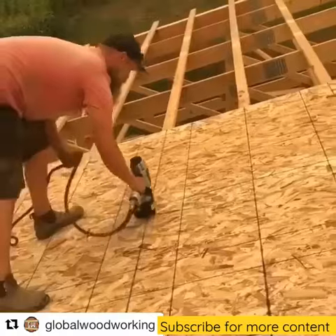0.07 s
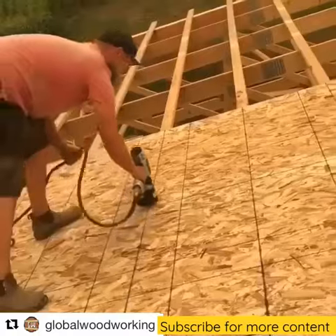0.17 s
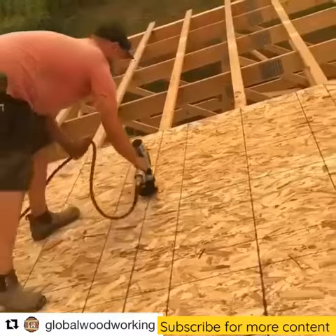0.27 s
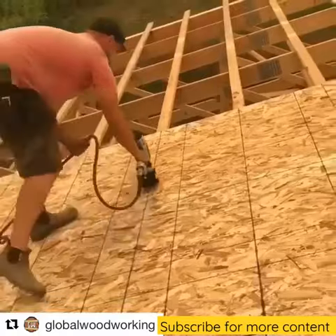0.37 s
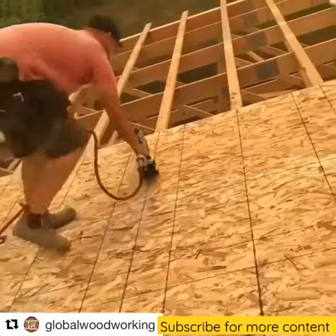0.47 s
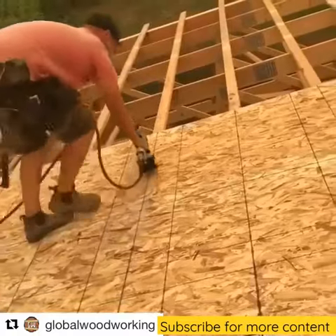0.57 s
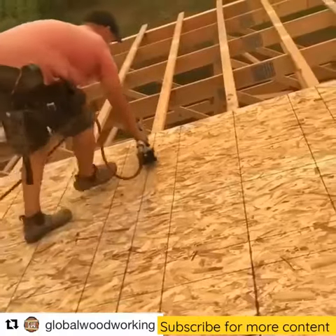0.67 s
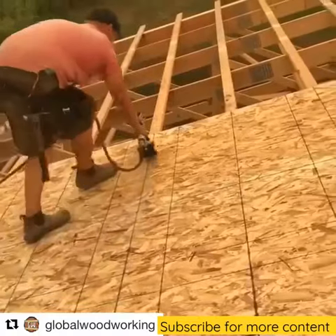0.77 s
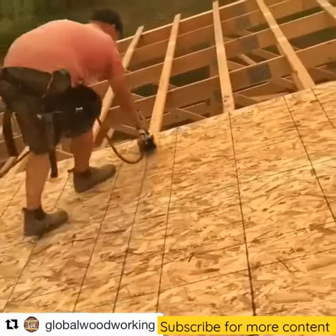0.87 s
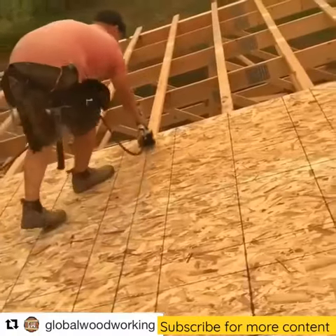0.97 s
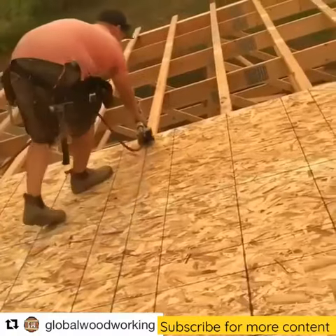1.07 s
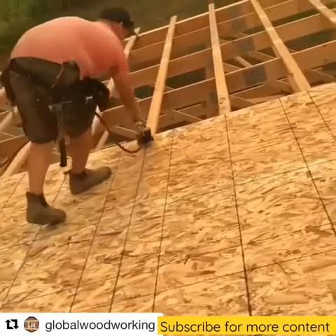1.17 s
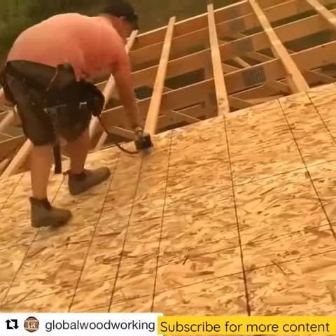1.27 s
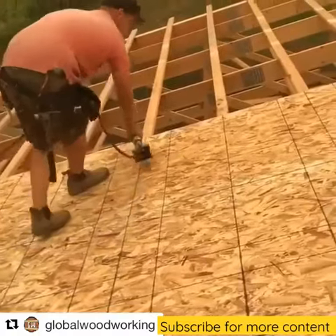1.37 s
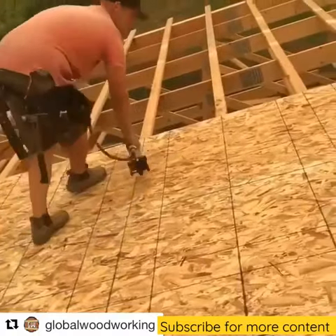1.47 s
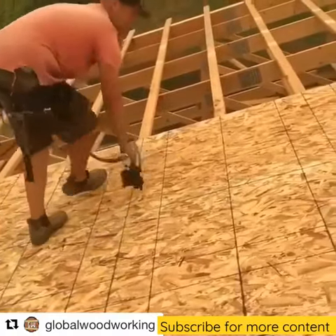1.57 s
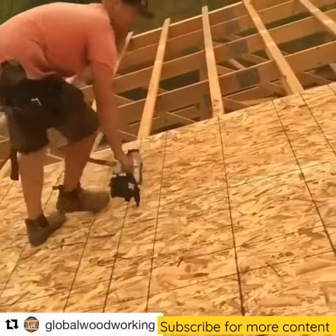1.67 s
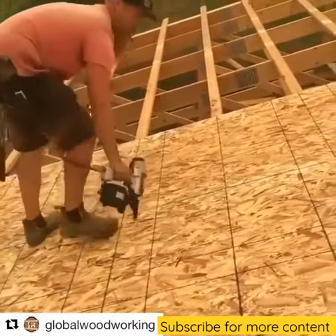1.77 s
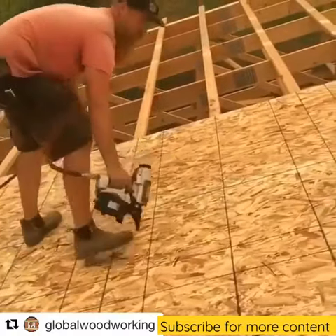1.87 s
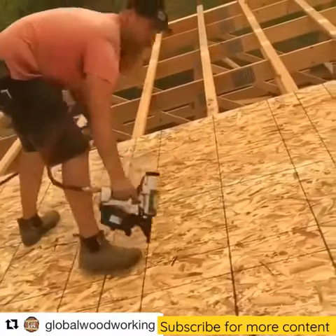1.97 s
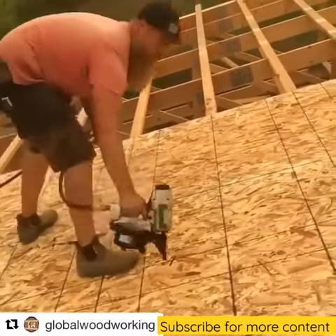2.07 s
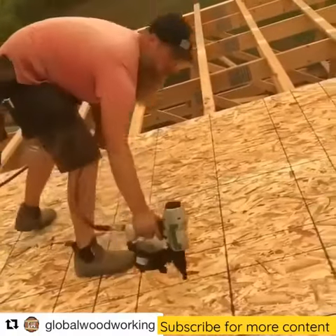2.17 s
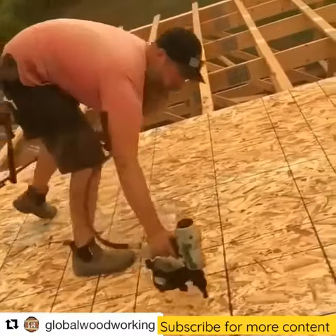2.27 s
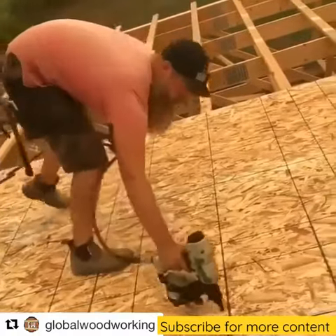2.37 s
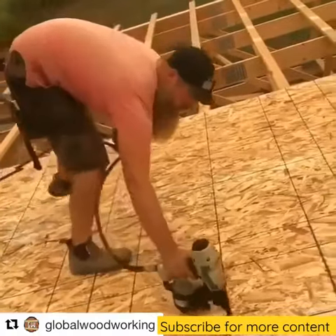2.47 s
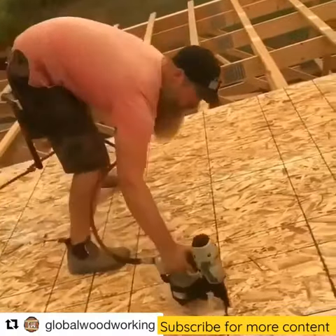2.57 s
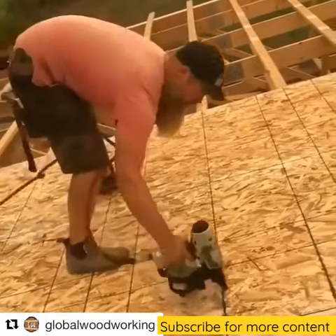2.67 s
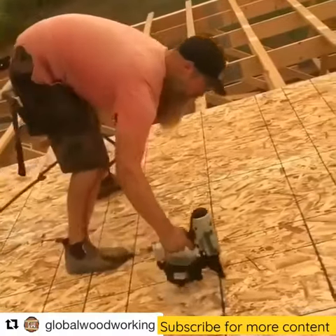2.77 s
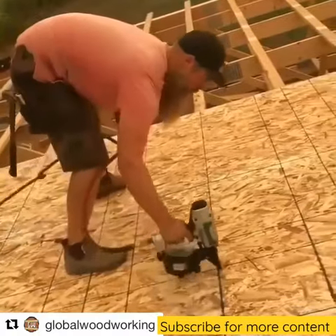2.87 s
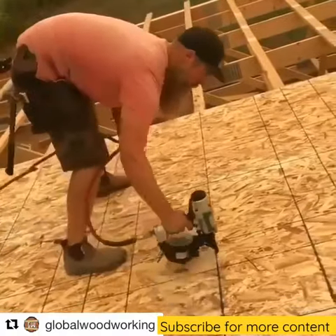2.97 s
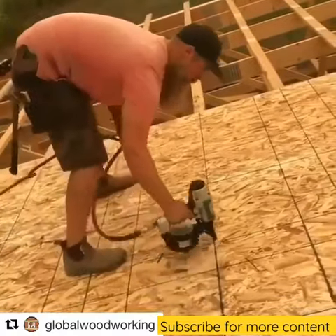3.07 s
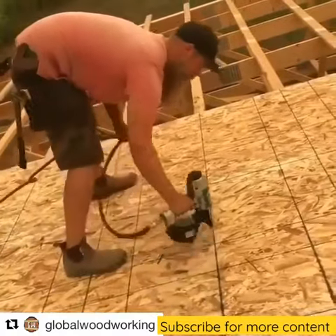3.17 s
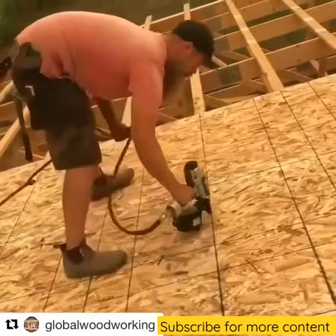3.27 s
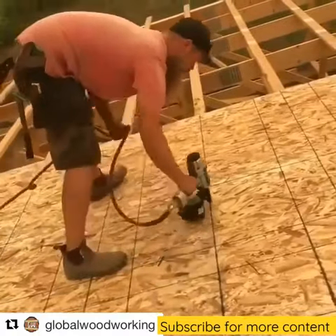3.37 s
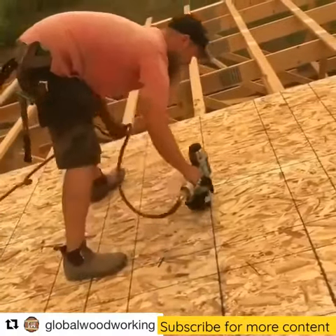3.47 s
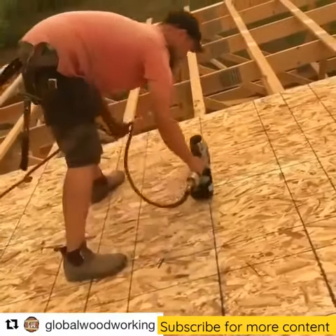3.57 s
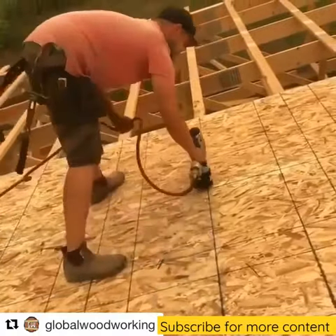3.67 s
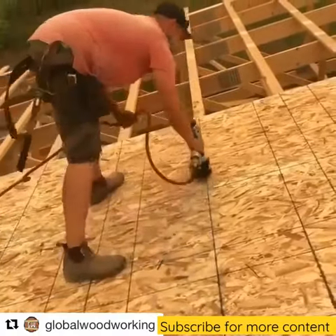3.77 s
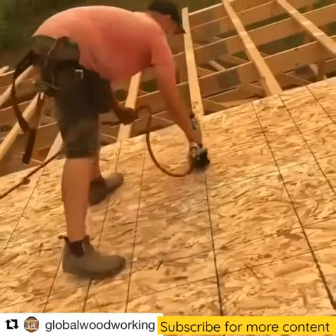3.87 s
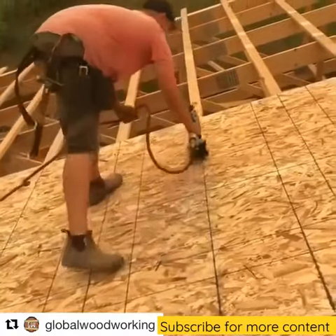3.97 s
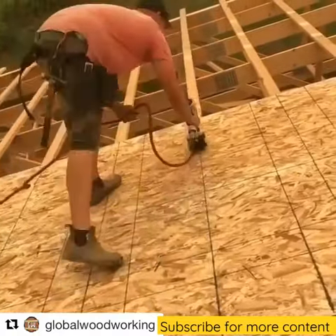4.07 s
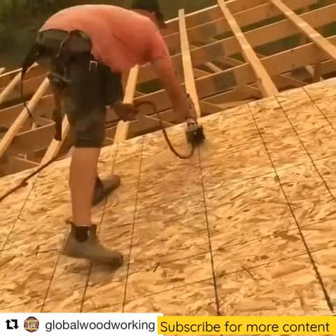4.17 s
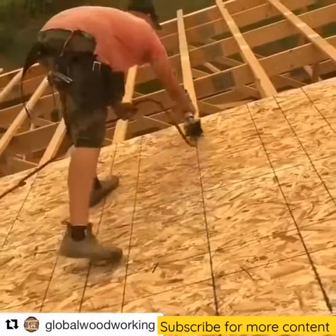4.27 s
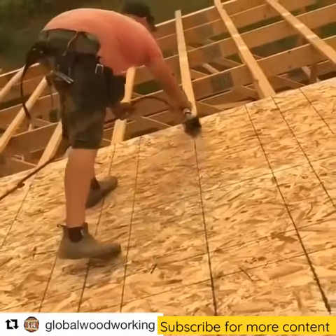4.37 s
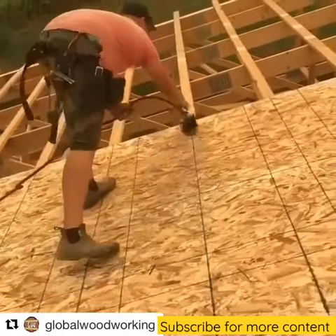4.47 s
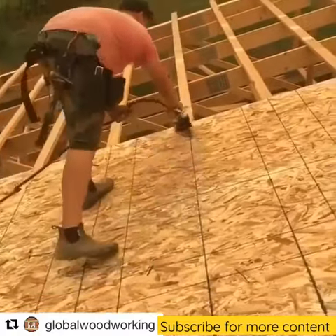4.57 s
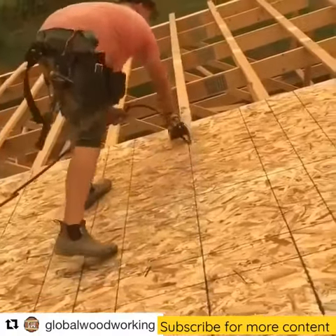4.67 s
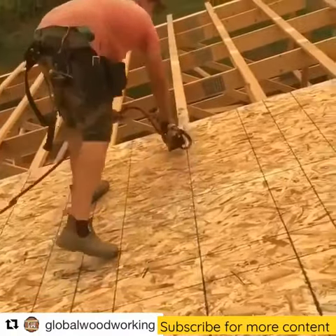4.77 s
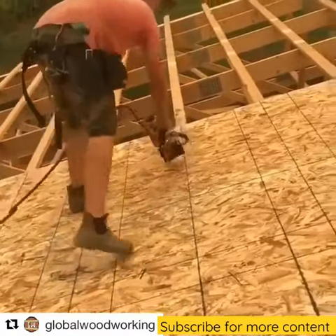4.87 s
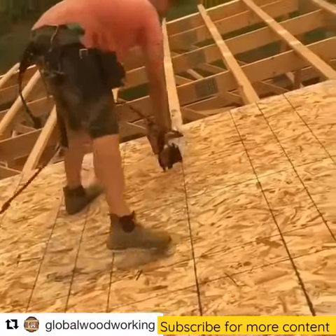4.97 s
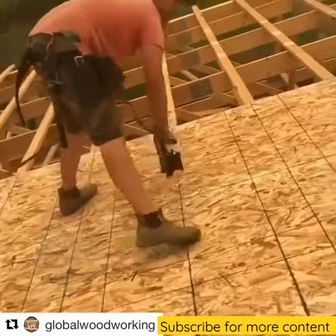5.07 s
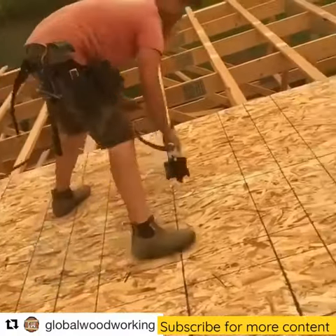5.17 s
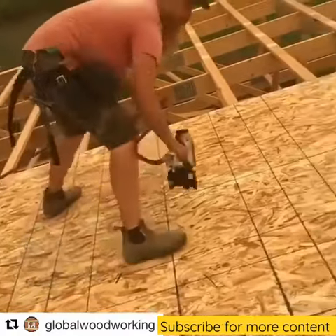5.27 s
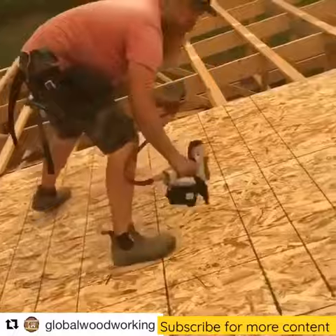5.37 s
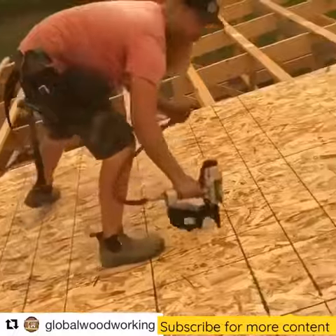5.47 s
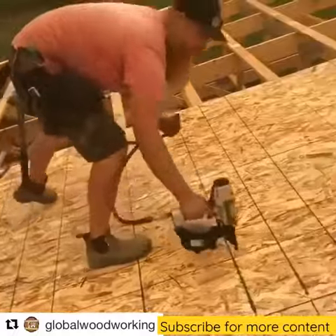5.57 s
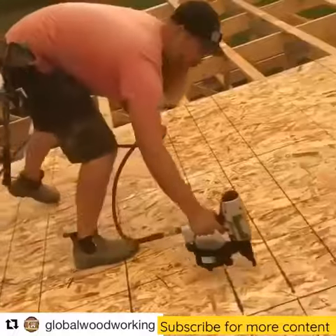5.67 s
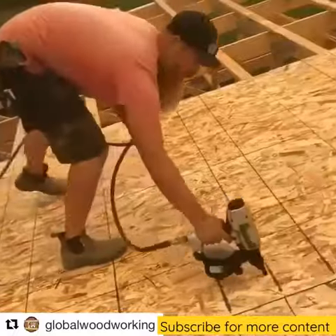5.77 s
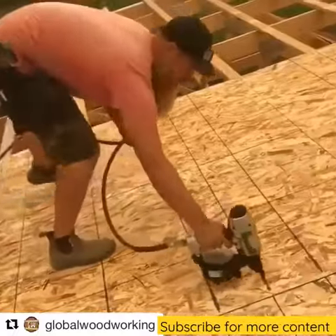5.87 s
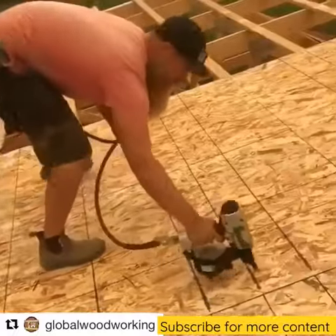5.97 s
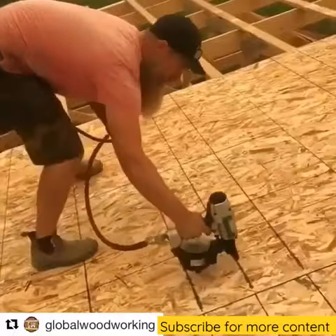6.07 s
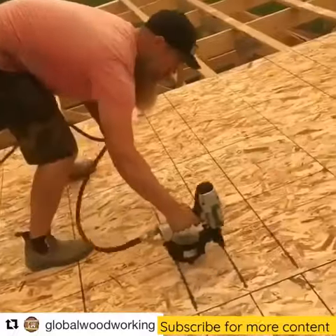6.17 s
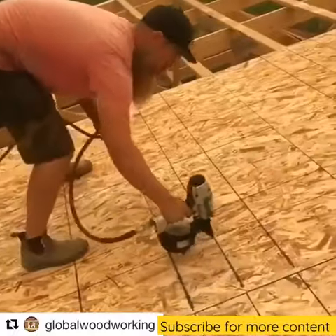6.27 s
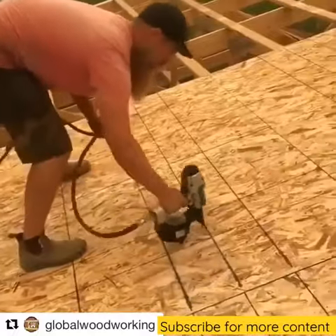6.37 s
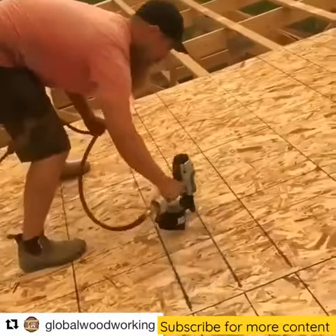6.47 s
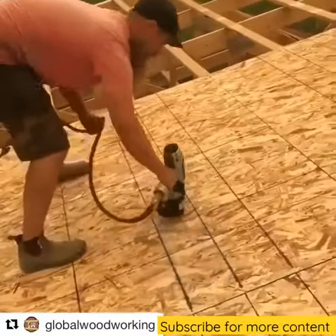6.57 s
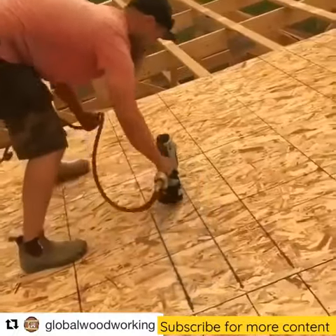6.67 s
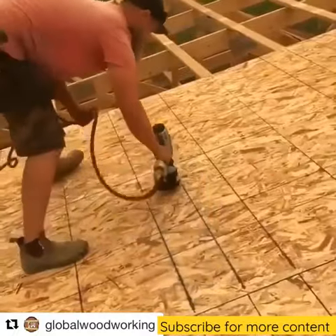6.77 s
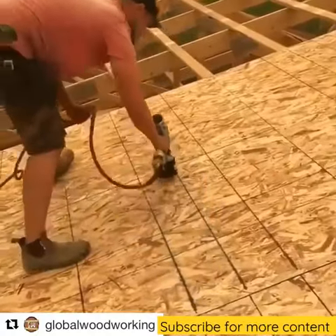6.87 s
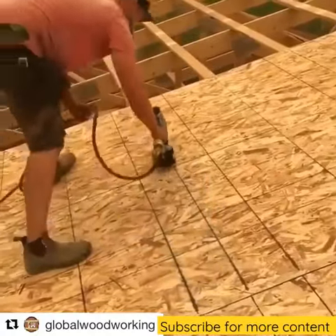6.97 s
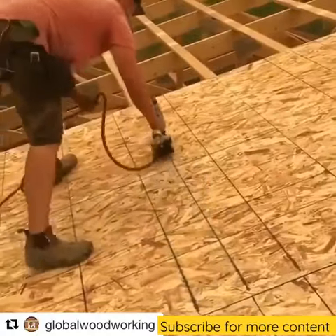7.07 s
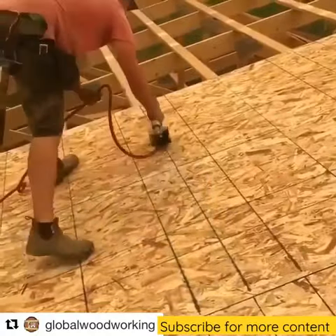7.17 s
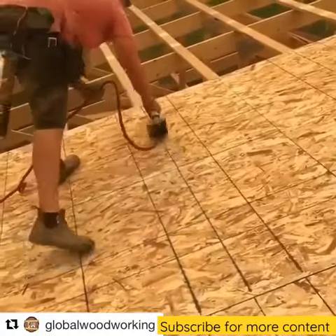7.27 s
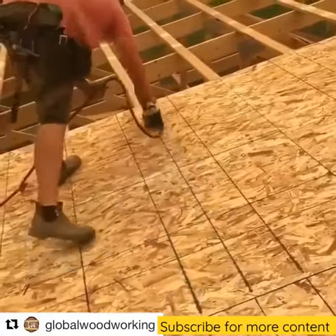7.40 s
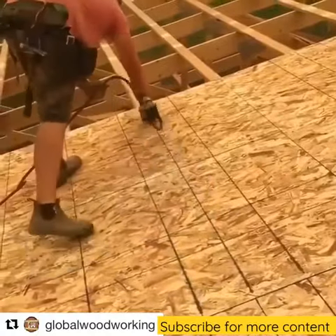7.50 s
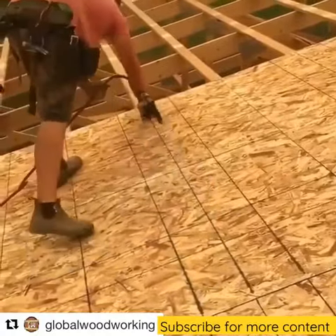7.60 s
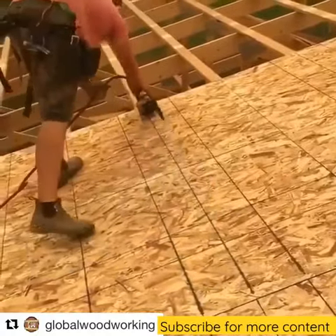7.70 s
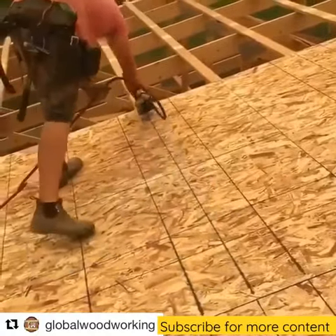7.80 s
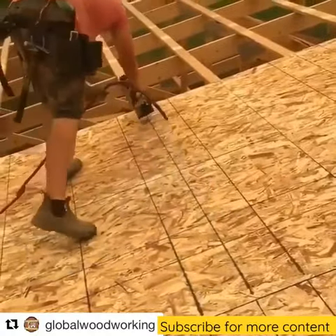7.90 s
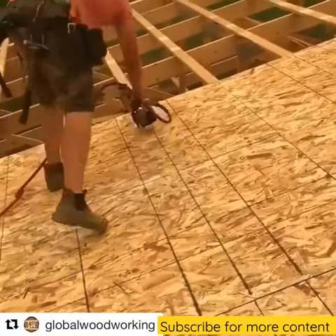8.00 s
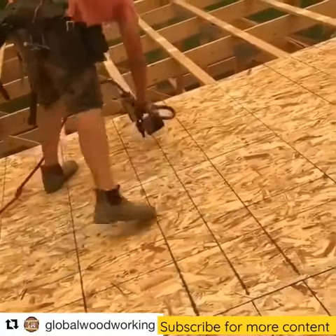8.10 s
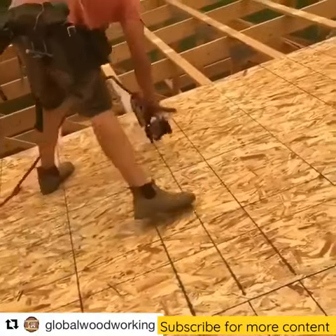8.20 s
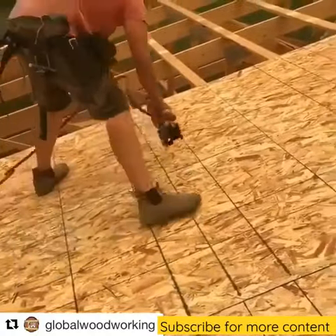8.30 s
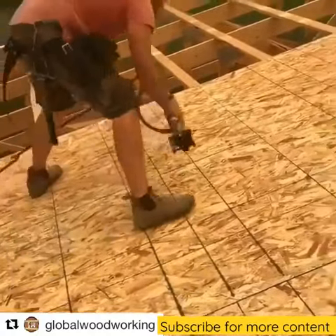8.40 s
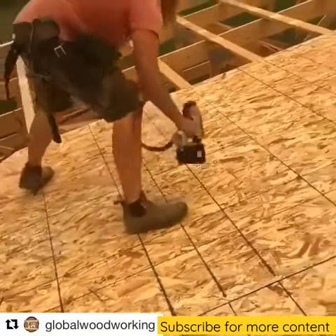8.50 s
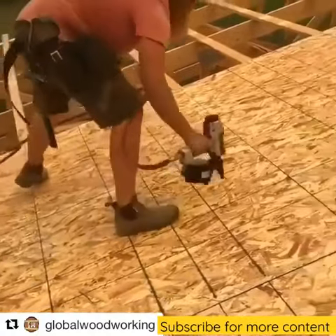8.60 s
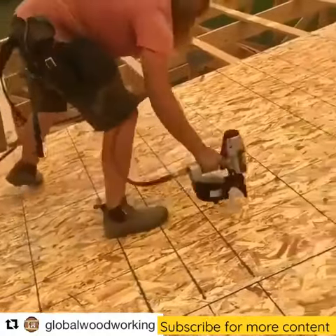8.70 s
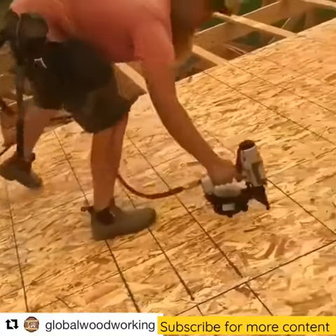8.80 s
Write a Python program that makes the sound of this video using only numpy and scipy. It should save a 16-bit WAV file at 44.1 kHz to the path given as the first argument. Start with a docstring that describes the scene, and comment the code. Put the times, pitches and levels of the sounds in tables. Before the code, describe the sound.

Outdoors on a springy roof deck, a pneumatic nail gun hammers about ten shots a second in three bursts, each softening and dulling as it moves away.

```python
"""A roofer bump-fires an air coil nailer along a wooden roof deck, about ten nails a second, in three runs.
Each shot is a valve pop, the driver's blow 5 ms later, a flex of the sheathing and a puff of exhaust, made
of noise bursts and short swings heard through bodies; it grows softer and duller as the tool moves away.
Between runs boots scuff and thud, the tool knocks and clicks and cloth rustles, over a low roof rumble.
A fast limiter at the microphone holds down the loudest peaks."""
import sys
import numpy as np
from scipy import signal
from scipy.io import wavfile
from scipy.ndimage import uniform_filter1d, minimum_filter1d

SR = 44100
rng = np.random.default_rng(int(sys.argv[2]) if len(sys.argv) > 2 else 0)


def output_pcm(signal):
    """Save a mono or channel-first signal as 16-bit PCM at the path in sys.argv[1].

    Samples are clipped to [-1, 1] before scaling.
    """
    pcm = np.clip(np.atleast_2d(signal).T, -1, 1) * 32767
    wavfile.write(sys.argv[1], SR, np.round(pcm).astype(np.int16))


N = 389844
T = np.arange(SR * 2 // 5) / SR  # time since a hit, s; every hit is cut off after 0.4 s

# one row a nail, levels against a usual one: start_s, blow_db on the wood, steel_crack_db,
# give_db of the spot, flex_hz of the sheet
NAIL_SHOTS = [(0.0225, -3, -1.5, 4.5, 123), (0.1185, -1, 3.5, 4, 131), (0.2144, 1.5, 2, 0.5, 109),
              (0.3082, 0.5, -3, -11, 129), (0.41, -5.5, -16, -18, 73), (0.5138, -4.5, -3, -16, 99),
              (.623, 0.5, 6.5, -2.5, 96), (.726, 0.5, 3, 3.5, 99), (0.8367, 0.5, 0.5, 2, 97),
              (0.9322, -2, -3.5, -1, 130), (1.0307, -1.5, -3.5, 0, 93), (1.1196, -3.5, 2.5, 4.5, 94),
              (1.213, -1, -3, -3, 75), (1.3054, -0.5, -2, -8, 108), (1.405, -0.5, -0.5, -5, 113),
              (2.8102, 4, 1, 1, 101), (3.0175, -4, -3, 5, 114), (3.0872, -4, -15, 10.5, 113),
              (3.366, 1, -1, 9, 116.8), (3.4744, 2, 4.5, 2, 177), (3.5547, -1.5, -16, 3, 75),
              (3.6407, -2, -3, 4.5, 116), (3.7249, -5.5, -3.5, -9, 120), (3.8119, -3, -14, -20, 132),
              (3.9085, -2.5, -5, -27, 140.5), (4.0114, -5, 1.5, -12, 104), (4.1021, -2, -2, -3.5, 103),
              (4.1978, 1.5, -5, 1, 145), (4.3016, 0, 4.5, 3, 136), (4.4027, 1, -0.5, 6.5, 95),
              (4.5009, -1, 0, 0, 118), (4.614, 2.5, 6.5, 0.5, 117), (4.7426, 2, 0, -5.5, 75),
              (4.8488, 0.5, 2.5, -19, 124), (6.2453, 2, 7, 0.5, 101), (6.441, 2.5, 3, 3.5, 100),
              (6.5454, -1, 1, 0, 102), (6.6333, -1, 2, 4, 99), (6.7372, -1, 4.5, 1, 106),
              (6.8361, 0, 1.5, 2, 155), (6.9341, 5, 1, -3, 161), (7.0274, -1, -7, 1.5, 94),
              (7.118, -0.5, -2.5, -2.5, 125.6), (7.2173, 0, -4, -4, 160), (7.322, -2.5, -0.5, -5, 117),
              (7.416, 4.5, 6.5, -1, 119), (7.5138, -2.5, 0.5, 4.5, 115), (7.618, .5, 3.5, 8.5, 142),
              (7.7179, -4, 0.5, 7.5, 146), (7.8188, 0, -3.5, 5, 153), (7.9252, 2, -0.5, 1, 154),
              (8.0205, -.5, 3, -4, 148), (8.1075, -3, -2.5, -17, 149)]
# passes up the roof, the tool sweeping away from the microphone: start_s, end_s, start_distance_m, sweep_s
ROOF_RUNS = [(0, 1.2, 2.64, 0.43), (2.75, 4.87, 1.59, 1.1), (6.2, 8.2, 1.66, .78)]
# spectrum of a blow heard through the roof board: freq_hz, level_db
BOARD_SPECTRUM = [(60, 0), (200, -2.5), (310, -7.5), (430, -13), (620, 0), (820, -2), (1050, -1),
                  (1450, -1), (1950, -14), (2300, -13.5), (2750, -21), (4500, -30), (7000, -62.5),
                  (14000, -47)]
# spectrum of the hollow deck rattling: freq_hz, level_db
DECK_SPECTRUM = [(120, -10.5), (260, 7), (340, 2.5), (450, -5.5), (630, 4.5), (850, -5.5), (1450, -1.5),
                 (2000, -12), (2800, -16.5), (5000, -30.5), (8000, -61)]
# spectrum of the nailer's struck steel: freq_hz, level_db
STEEL_SPECTRUM = [(500, -55), (1500, 15), (2300, -1), (2750, -5), (3300, 9), (4000, 3), (4700, 4.5),
                  (5400, -3), (6500, -17), (7600, -17), (10000, -18), (14000, -49)]
# spectrum of the exhaust end of the tool: freq_hz, level_db
EXHAUST_SPECTRUM = [(500, -6.5), (1500, 2), (2200, -3.5), (2750, -8.5), (3400, 7), (4100, 2), (4700, 1.5),
                    (5400, -6), (6400, -17.5), (7600, -17.5), (9000, -17), (12000, -14), (14000, -44)]


def nailer():
    """The nose slides in, the valve pops, the driver sinks the nail, the deck flexes and the air vents."""
    usual_crack_db, usual_flex_db = -22.5, -17
    out = np.zeros(N)
    for s, wood_db, steel_db, give_db, flex_hz in NAIL_SHOTS:
        valve_db, blow_db, air_db, boom_db, shake_db, dent_db = shot_levels(s, wood_db, give_db)
        late, slack, early, pressure = rng.standard_normal(4)  # how this shot strays from the usual
        hit = s + 0.0053 + 0.0003 * late
        nose_slide(out, s - 0.016 + 0.002 * early, air_db)
        valve_pop(out, s, valve_db)
        drive(out, s, hit, blow_db, usual_crack_db + steel_db, air_db)
        deck_flex(out, s, hit, dent_db, usual_flex_db + give_db, flex_hz, shake_db, boom_db)
        reload(out, s, blow_db, air_db, late, slack)
        exhaust_puff(out, s, air_db, slack, pressure)
    return out


def nose_slide(out, s, air_db):
    """The safety nose slides in and shakes the coil of nails: a grainy scatter of impacts."""
    rattle = sounded(scatter(decay=0.0094, rise=0.0048, grain=0.89), body(EXHAUST_SPECTRUM), echo=0.51)
    add(out, s, amp(0.8 * air_db - 6.0) * rattle)  # fades less with distance than the exhaust


def valve_pop(out, s, valve_db):
    """The firing valve opens with a hollow pop, heard through steel and board."""
    add(out, s - 0.0003, amp(valve_db - 16.5) * swing(hz=1220, rise=0.00051))
    in_steel = sized(through(tap(decay=0.0047, direct=0.23), body(STEEL_SPECTRUM)))
    add(out, s, amp(valve_db - 18.5) * in_steel)
    in_board = sized(through(tap(decay=0.00044, direct=0.32), body(BOARD_SPECTRUM)))
    add(out, s, amp(valve_db - 15.5) * in_board)


def drive(out, s, hit, blow_db, crack_db, air_db):
    """The nail enters the board, then the piston hits its bumper and sets wood and steel ringing."""
    # board around the nail: mode_hz, level_db against the blow
    nail_spot = [(665, -7.5), (1430, -10.5)]
    pitch_spread = 0.093  # share by which the modes vary from spot to spot
    board, steel = body(BOARD_SPECTRUM), body(STEEL_SPECTRUM)
    entry = sized(through(tap(decay=0.00092, direct=-0.41), board))
    add(out, s + 0.003658, amp(blow_db - 4.5) * entry)
    blow = sounded(tap(decay=0.0072, direct=0.54), board, echo=0.19)
    add(out, hit, amp(blow_db + 2.0) * blow)
    crack = sounded(tap(decay=0.00067, direct=0.44), steel, echo=0.34)
    add(out, hit - 0.0005, amp(crack_db + 2.0) * crack)
    add(out, hit, amp(air_db - 22.0) * ring())
    rebound = sounded(tap(decay=0.002, direct=0.8), steel, echo=0.25)
    add(out, hit + 0.0034, amp(air_db) * rebound)
    for hz, db in nail_spot:
        add(out, hit, amp(blow_db + db) * knock(hz * rng.normal(1, pitch_spread), decay=0.01))


def deck_flex(out, s, hit, dent_db, flex_db, flex_hz, shake_db, boom_db):
    """The sheet is pushed in, swings on its rafters, and the blow spreads through the roof."""
    # spectrum of the boom under the deck: freq_hz, level_db
    boom_spectrum = [(25, -23), (55, -15), (100, 9), (135, 2.5), (165, 5.5), (200, 0.5), (245, -2.5),
                     (330, -14), (450, -31), (900, -54.5)]
    add(out, s + 0.00592, amp(dent_db) * swing(hz=250.2, rise=0.0042))
    add(out, s + 0.01018, amp(flex_db - 3.5) * swing(flex_hz, rise=0.0062))
    shake = sounded(scatter(decay=0.052, rise=0.0011), body(DECK_SPECTRUM), echo=0.45)
    add(out, hit, amp(shake_db) * shake)
    boom = sized(through(scatter(decay=0.066, rise=0.0009), body(boom_spectrum)))
    add(out, hit, amp(boom_db + 8.0) * boom)


def reload(out, s, blow_db, air_db, late, slack):
    """The piston returns with a thump and the pawl feeds the next nail with a click."""
    piston = sounded(tap(decay=0.0015, direct=1.0), body(BOARD_SPECTRUM), echo=0.27)
    add(out, s + 0.054 + 0.00278 * late, amp(blow_db - 27.5) * piston)
    pawl = sounded(tap(decay=0.0012, direct=0.52), body(STEEL_SPECTRUM), echo=0.54)
    add(out, s + 0.054 + 0.0081 * slack, amp(air_db - 6.5) * pawl)


def exhaust_puff(out, s, air_db, slack, pressure):
    """A bright jet of air, a longer duller hiss, and a short puff that rings the steel parts."""
    # spectrum of the vent's first jet of air: freq_hz, level_db
    jet_spectrum = [(1500, -10), (4000, 9.5), (5500, 4), (7500, -4), (9000, 0), (12000, -3.5),
                    (14000, -5.5)]
    jet_spread_db = 1.5  # the jet varies from shot to shot
    jet_air = puff(half_open=0.011 + 0.0018 * slack, rise=0.0034, fall=0.019)
    jet = sounded(jet_air, body(jet_spectrum), echo=0.49)
    add(out, s, amp(air_db + 3.5 + jet_spread_db * pressure) * jet)
    hiss_air = puff(half_open=0.021 + 0.0092 * slack, rise=0.023, fall=0.021)
    hiss = sounded(hiss_air, body(EXHAUST_SPECTRUM), echo=0.8)
    add(out, s, amp(air_db + 6.0) * hiss)
    ringing_air = through(puff(half_open=0.023, rise=0.0035, fall=0.0027), ring())
    add(out, s, amp(air_db - 1.0) * sized(ringing_air))


def puff(half_open, rise, fall):
    """Air pressure builds as the valve opens, then drains raggedly from the cylinder (times in s)."""
    opening = 1 / (1 + np.exp(np.minimum((half_open - T) / rise, 50)))
    draining = np.exp(-np.maximum(T - half_open, 0) / fall)
    flow = opening * draining * flutter(len(T), depth_db=2.0, size=110)
    return sized(flow * rng.standard_normal(len(T)))


def ring():
    """The nailer's steel parts as decaying sines, struck a little differently each time."""
    # steel parts: ring_hz, level_db, t60_s
    steel_parts = [(3500, -13, .08), (4080, -1, 0.18), (4470, 7, 0.17), (4840, 3, 0.063)]
    tones = np.zeros(len(T))
    for hz, db, t60 in steel_parts:
        strike = rng.normal(1, 0.27)
        tones += strike * amp(db - 60 * T / t60) * np.sin(2 * np.pi * hz * rng.normal(1, 0.00154) * T)
    return sized(tones)


def distance(s):
    """Distance to the microphone in m: the tool speeds away, then slows as the arm reaches full stretch."""
    full_stretch_m = 3.7
    start, _, start_m, sweep_s = min(ROOF_RUNS, key=lambda run: abs(s - (run[0] + run[1]) / 2))
    return full_stretch_m - (full_stretch_m - start_m) * np.exp(-((s - start) / sweep_s) ** 2)


def shot_levels(s, wood_db, give_db):
    """Relative dB of valve, blow, exhaust, boom, shake and dent, from distance, blow and give of the spot."""
    near_m = 1.86  # the tool at the roofer's feet
    # each part: (dB at near_m, dB lost per doubling of distance)
    # valve and vent also turn away from the microphone, so they fade fastest
    valve, blow, vent = (-1, 15.6), (-12, 4.5), (-24, 13.93)
    deck_boom, deck_shake, dent = (-25, 3.9), (-15.5, 4.9), (-18.5, 7.8)
    # a springy spot passes more of the blow into the roof and dents further (dB per dB of give)
    boom_per_give, shake_per_give, dent_per_give = 0.35, 0.089, 0.34
    doublings = np.log2(distance(s) / near_m)
    parts = (valve, blow, vent, deck_boom, deck_shake, dent)
    valve_db, blow_db, air_db, boom_db, shake_db, dent_db = (db - loss * doublings for db, loss in parts)
    return (valve_db, blow_db + wood_db, air_db, boom_db + boom_per_give * give_db,
            shake_db + shake_per_give * give_db, dent_db + dent_per_give * give_db)


def handling():
    """Knocks and clicks of the tool in wood and steel, and boots swinging the springy deck."""
    # boots landing on the deck: start_s, relative level_db, pitch_hz
    boot_steps = [(2.061, -47, 102), (5.417, -31, 79), (5.453, -30, 61), (5.513, -38, 70),
                  (8.639, -33.5, 72)]
    board, deck, steel = map(body, (BOARD_SPECTRUM, DECK_SPECTRUM, STEEL_SPECTRUM))
    out = np.zeros(N)
    for s, wood_db, metal_db, decay, hz in contacts():
        wood = sounded(tap(decay, direct=0.13), board, echo=0.17)
        wood += amp(-3.0) * knock(hz, decay=0.0028)
        wood += amp(-4) * sounded(scatter(decay=0.049), deck, echo=0.36)
        wood += amp(-7) * knock(hz=336, decay=0.017)  # the sheet's low note
        metal = sounded(tap(decay, direct=0.95), steel, echo=0.086) + amp(-20.0) * ring()
        add(out, s, amp(wood_db - 4.0) * wood + amp(metal_db) * metal)
    for s, db, hz in boot_steps:
        add(out, s, amp(db + 7.0) * swing(hz, rise=0.0056))
    return out


def contacts():
    """Every knock, click and set-down: start_s, relative wood_db and metal_db, decay_s, ring_hz."""
    # tool and boots knocking on the deck: start_s, relative level_db, decay_s, wood_ring_hz
    deck_knocks = [(2.06, -32, 0.0071, 420), (2.301, -38, 0.008, 666), (2.604, -23.5, 0.005, 1250),
                   (2.769, -22.5, 0.017, 870), (5.881, -23.5, 0.016, 950), (5.89, -18.5, 0.0023, 1030),
                   (5.93, -16, 0.0043, 1600), (6.044, -35.5, .004, 784), (6.205, -26.5, 0.022, 770)]
    # loose metal parts of the tool clicking: start_s, level_db
    tool_clicks = [(1.949, -42.5), (2.009, -45), (5.422, -55), (5.463, -49), (5.52, -60), (5.573, -47),
                   (5.791, -47), (5.891, -26), (8.672, -40), (8.745, -54)]
    knock_metal_db = -23  # the tool's rattle, set against each knock
    click_wood_db, click_decay_s, click_hz = -7, 0.0024, 1480  # the duller body of each click
    rows = [(s, db, db + knock_metal_db, decay, hz) for s, db, decay, hz in deck_knocks]
    rows += [(s, db + click_wood_db, db, click_decay_s, click_hz) for s, db in tool_clicks]

    # after a pause the nose is set down afresh and clatters just before the shot
    pause_s, lead_s, growth_db = 0.16, 0.018, 2  # growth per doubling: the tool has been lifted higher
    wood_db, metal_db, decay_s, ring_hz = -35.5, -36.5, 0.97, 1401
    shots = [nail[0] for nail in NAIL_SHOTS]
    for s, pause in zip(shots[1:], np.diff(shots)):
        if pause > pause_s:
            drop_db = growth_db * np.log2(pause / pause_s)
            rows.append((s - lead_s, wood_db + drop_db, metal_db + drop_db, decay_s, ring_hz))
    return rows


def scuffs(slips_per_s=450, catch_db=2.0):
    """Rubber catching and slipping on wood flakes: each slip taps the board and grinds the grit."""
    # boot soles sliding over the rough board: start_s, length_s, wood_rub_db, grit_rasp_db
    sole_slides = [(1.472, 0.18, -42.5, -59), (1.598, 0.17, -34, -50), (1.752, 0.064, -39.5, -45.5),
                   (4.979, 0.254, -33, -50.5), (8.282, .13, -35, -48.5)]
    # spectrum of the sole rubbing the wood: freq_hz, level_db
    sole_spectrum = [(250, 7), (430, -6.5), (540, 5), (670, 4.5), (850, 0.5), (1100, -3.5), (1500, -1.5),
                     (1900, -10), (2400, -18), (3000, -45.5)]
    # spectrum of the grit rasping: freq_hz, level_db
    grit_spectrum = [(1800, -4), (2800, -2), (3300, 5.5), (4000, 1.5), (4700, 1.5), (5400, -5.5),
                     (6200, -17.5), (9000, -23), (14000, -29)]
    attack_share, release_s = 0.28, 0.015  # the sole takes hold over this share of the slide
    rub_swell_db, grit_swell_db = 1.5, 8  # growth over a slide as weight comes onto the boot
    wood, grit = np.zeros(N), np.zeros(N)
    for s, length, wood_db, grit_db in sole_slides:
        attack_s = attack_share * length
        wood += amp(wood_db) * gesture(s, length, attack_s, release_s, rub_swell_db)
        grit += amp(grit_db) * gesture(s, length, attack_s, release_s, grit_swell_db)
    slips = evened(rng.standard_normal(N) * (rng.random(N) < slips_per_s / SR))
    force = (slips + 1.45 * rng.standard_normal(N)) * flutter(N, catch_db, size=600)
    rubbing = wood * evened(through(force, body(sole_spectrum)))
    return rubbing + grit * evened(through(force, body(grit_spectrum)))


def rustle():
    """Soft uneven friction of hose and cloth, as filtered noise."""
    # hose and clothes rustling between runs: start_s, length_s, level_db
    cloth_moves = [(2.07, 0.16, -46), (2.3, 0.24, -56), (2.68, .08, -53), (5.422, .2, -55.5),
                   (5.651, 0.33, -46.5), (5.98, 0.028, -60), (8.56, 0.38, -54)]
    # spectrum of the cloth: freq_hz, level_db
    cloth_spectrum = [(350, 1.5), (600, -8.5), (900, -2.5), (1250, -3.5), (1650, -3), (2300, -11),
                      (2900, -19), (4500, -20), (6500, -34), (14000, -42)]
    level = np.zeros(N)
    for s, length, db in cloth_moves:
        level += amp(db) * gesture(s, length, attack=0.022, release=0.05, swell_db=-0.5)
    friction = rng.standard_normal(N) * flutter(N, depth_db=3.0, size=500)
    return level * evened(through(friction, body(cloth_spectrum)))


def outdoors():
    """Low noise rumble, stronger while the roof is being worked, under a faint distant wash."""
    # spectrum of the low rumble: freq_hz, level_db
    rumble_spectrum = [(20, -9), (35, -8), (55, 8.5), (80, 4), (108, 3), (180, -8.5), (250, -8),
                       (370, -8.5), (430, -19.5), (650, -51)]
    # spectrum of the deepest rumble: freq_hz, level_db
    deep_spectrum = [(20, -5), (35, -3), (52, 11), (70, -13), (110, -33), (400, -97)]
    # spectrum of the distant wash: freq_hz, level_db
    air_spectrum = [(300, -0.5), (600, 2), (900, -4), (1400, 2), (2200, -16), (3500, -12), (5000, -20),
                    (7000, -47), (14000, -52)]
    rest_db, worked_db = -40, -41.5  # rumble at rest, and what the roof frame adds during a run
    worked = np.zeros(N)
    for start, end, _, _ in ROOF_RUNS:
        worked += gesture(start, end - start, attack=0.01, release=0.73, swell_db=5.5)
    rumble_level = np.hypot(amp(rest_db), amp(worked_db) * worked)
    rumble = rumble_level * evened(through(rng.standard_normal(N), body(rumble_spectrum)))
    rumble = rumble * flutter(N, depth_db=-0.3, size=5000)
    # the deepest rumble swells as the last run begins
    deep_level = amp(-33) * gesture(start=6.22, length=0.75, attack=0.013, release=0.08, swell_db=3)
    deep = deep_level * evened(through(rng.standard_normal(N), body(deep_spectrum)))
    wash = amp(-56.5) * evened(through(rng.standard_normal(N), body(air_spectrum)))
    return rumble + deep + wash


def scatter(decay, rise=0.0014, grain=0.22):
    """A dying train of random impacts; grain makes a few stand out."""
    impacts = rng.standard_normal(len(T)) * np.exp(grain * rng.standard_normal(len(T)))
    return sized(impacts * np.exp(-T / decay) * (1 - np.exp(-T / rise)))


def tap(decay, direct):
    """One sharp contact followed by its scatter."""
    return direct * sized(1. * (T == 0)) + scatter(decay)


def swing(hz, rise):
    """A few cycles that swell and die."""
    return sized(T * np.exp(-T / rise) * np.sin(2 * np.pi * hz * T))


def knock(hz, decay):
    """A mode of the board set ringing."""
    return sized(np.exp(-T / decay) * (1 - np.exp(-T / 0.00047)) * np.sin(2 * np.pi * hz * T))


def sounded(force, response, echo):
    """A hit heard through a body and its near reflections, at unit size."""
    return sized(echoed(through(force, response), echo))


def echoed(x, share, nearest=.0006, farthest=.006, count=4):
    """Bounces off the board, the tool and the roofer, which lie differently for every hit (delays in s)."""
    out = x.copy()
    for delay, sign in zip(rng.uniform(nearest, farthest, count), rng.choice([-1, 1], count)):
        add(out, delay, share * sign * x)
    return out


def through(force, response):
    """A force heard through a body."""
    return signal.oaconvolve(force, response)[:len(force)]


def body(points, size=4096):
    """Causal (minimum-phase) impulse response with the given spectrum."""
    f, db = np.transpose(points)
    log_hz = np.log(abs(np.fft.fftfreq(size, 1 / SR)) + 1)
    skirt_db = 12 * np.maximum(np.log(f[0]) - log_hz, 0)  # rolls off below the first point
    log_gain = np.log(amp(np.interp(log_hz, np.log(f), db) - skirt_db))
    return np.fft.ifft(np.exp(np.conj(signal.hilbert(log_gain)))).real[:size // 2]


def gesture(start, length, attack, release, swell_db):
    """Attack, a hold that changes by swell_db to end at full level, and release (times in s)."""
    t = np.arange(N) / SR - start
    hold = amp(swell_db * (np.clip(t / length, 0, 1) - 1.0))
    return np.clip(t / attack, 0, 1) * hold * np.exp(-np.maximum(t - length, 0) / release)


def flutter(length, depth_db, size):
    """An uneven gain whose lumps last about size samples."""
    return amp(depth_db * evened(uniform_filter1d(rng.standard_normal(length), size=size)))


def amp(db):
    """Decibels to gain."""
    return 10 ** (np.asarray(db) / 20)


def evened(x):
    """Scales to rms 1."""
    return x / np.sqrt(np.mean(x ** 2) + 1e-20)


def sized(x):
    """Scales a hit to the energy of 10 ms at rms 1."""
    return x / np.sqrt(np.sum(x ** 2) / (SR / 100) + 1e-20)


def add(mix, s, sound):
    """Mixes a sound in at time s."""
    part = mix[max(round(s * SR), 0):][:len(sound)]
    part += sound[:len(part)]


def scene():
    """Everything on the roof, in one channel."""
    return (nailer() + handling() + scuffs() + rustle() + outdoors())[None]


def record(dry, recovery_db_per_s=700):
    """The microphone's bass cut, a fast peak limiter, then the band limit."""
    ceiling_db, edge_hz = -3, 14000
    x = signal.lfilter(*signal.butter(2, 24, "high", fs=SR), dry[0])
    over_db = np.maximum(20 * np.log10(abs(x) + 1e-9) - ceiling_db, 0)
    # each peak's reduction is let go at the recovery rate
    fall = np.arange(N) / SR * recovery_db_per_s
    held_db = np.maximum.accumulate(over_db + fall) - fall
    # widened and smoothed, so the gain starts down just ahead of the peak
    widened_db = -minimum_filter1d(-held_db, size=31)
    duck_db = uniform_filter1d(widened_db, size=31)
    low_pass = signal.firwin(301, edge_hz, window=("kaiser", 8), fs=SR)
    return signal.oaconvolve(x * amp(-duck_db), low_pass, "same")[None]


dry = scene()
out = record(dry)
output_pcm(out)
```